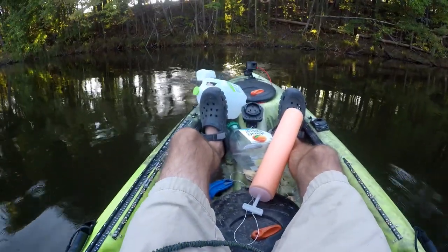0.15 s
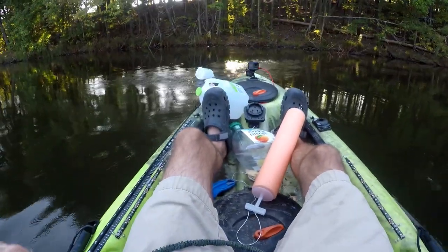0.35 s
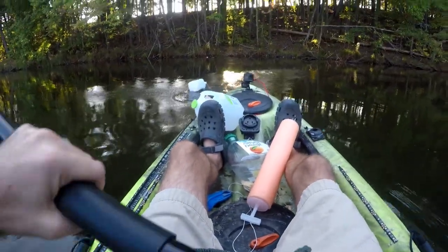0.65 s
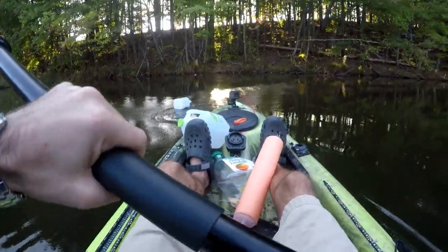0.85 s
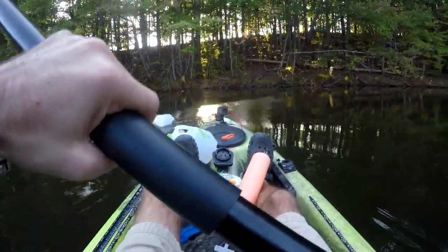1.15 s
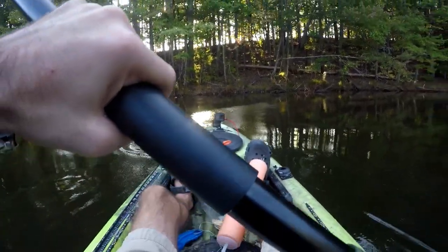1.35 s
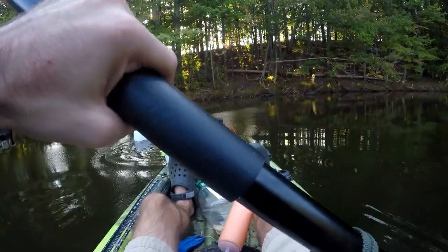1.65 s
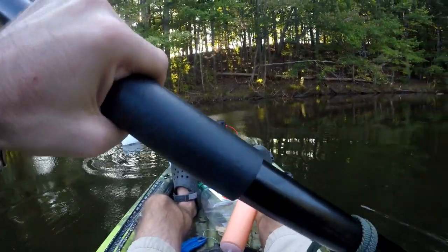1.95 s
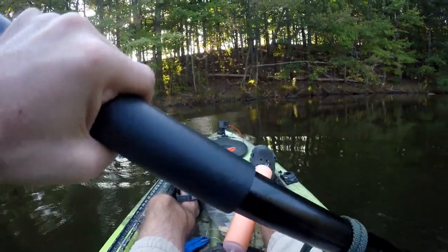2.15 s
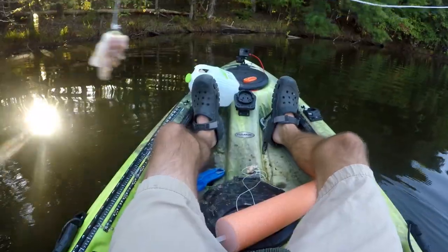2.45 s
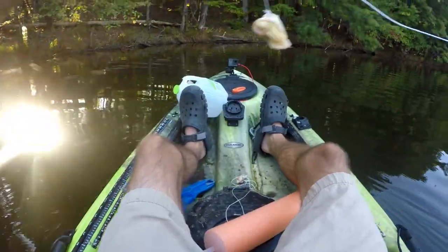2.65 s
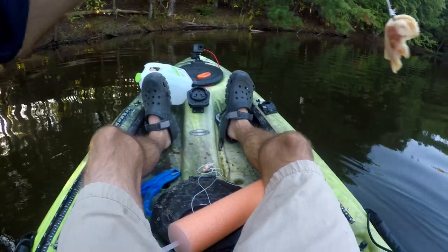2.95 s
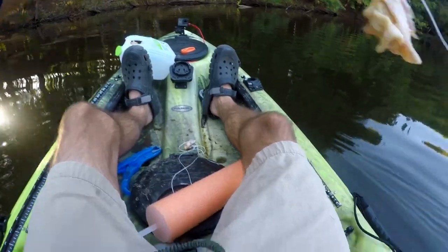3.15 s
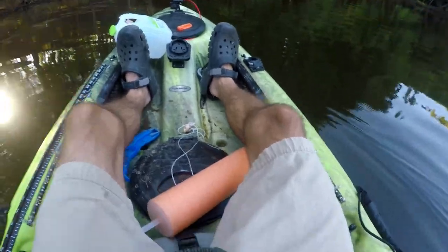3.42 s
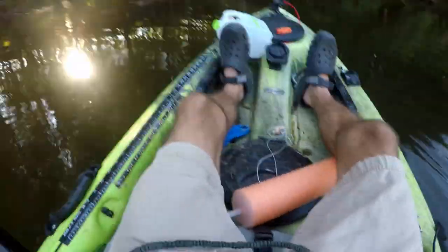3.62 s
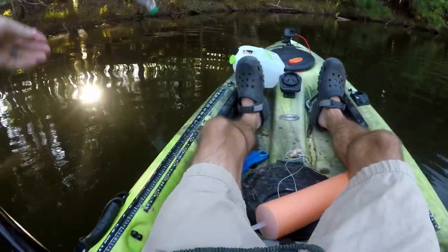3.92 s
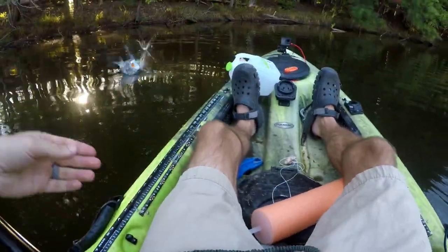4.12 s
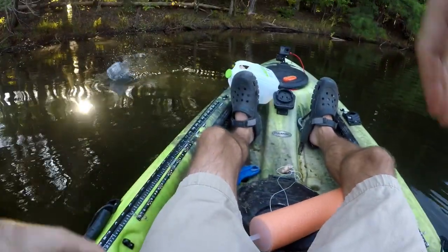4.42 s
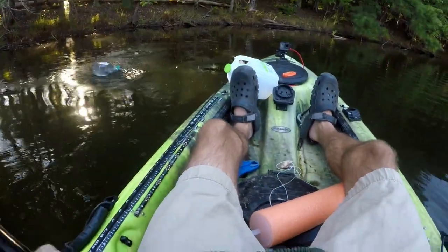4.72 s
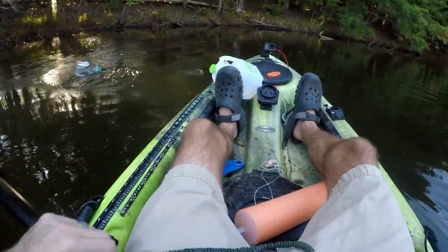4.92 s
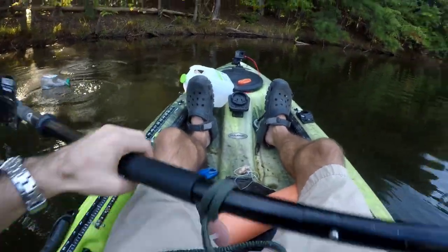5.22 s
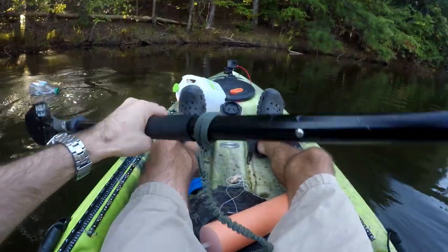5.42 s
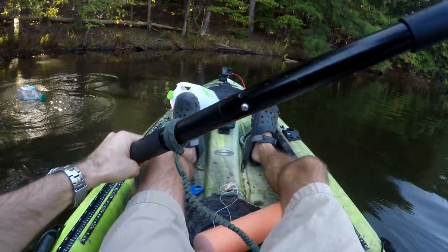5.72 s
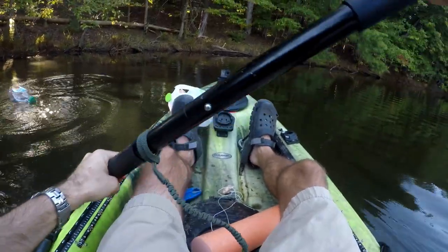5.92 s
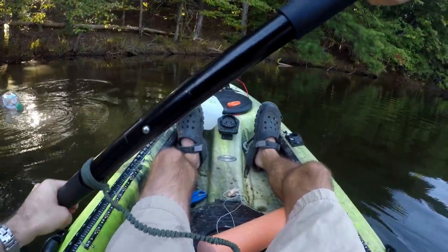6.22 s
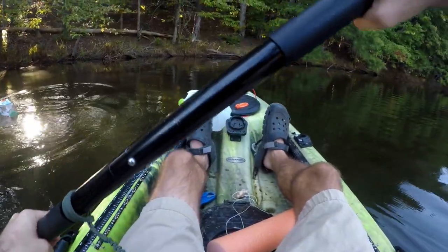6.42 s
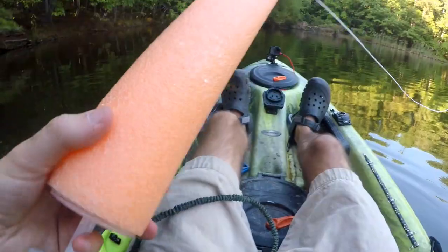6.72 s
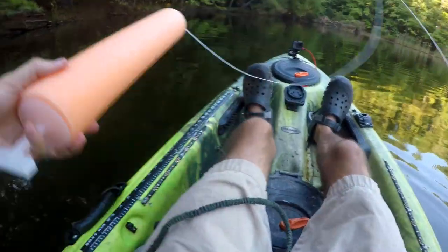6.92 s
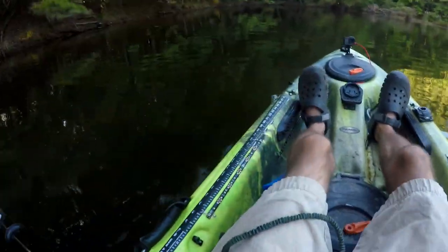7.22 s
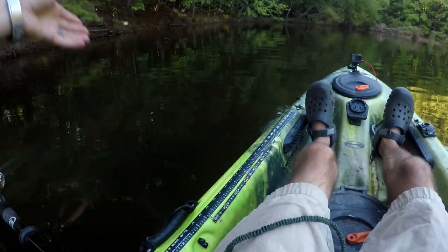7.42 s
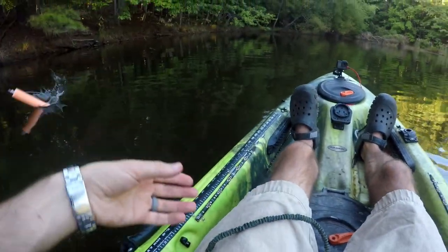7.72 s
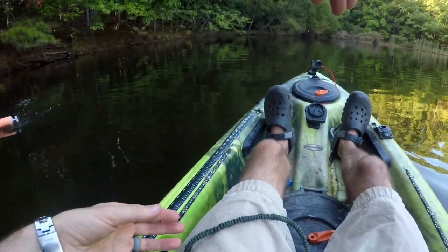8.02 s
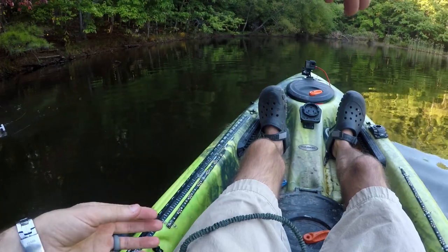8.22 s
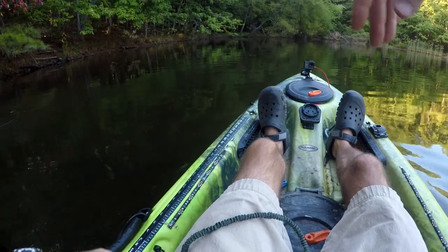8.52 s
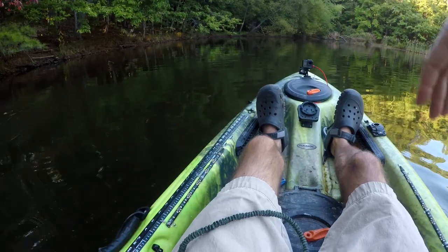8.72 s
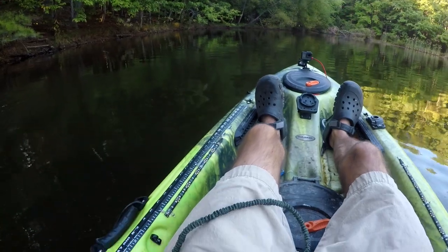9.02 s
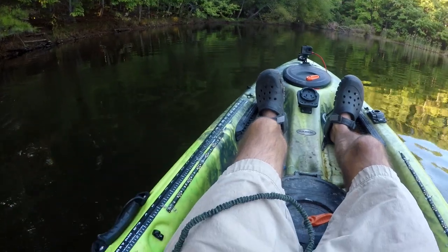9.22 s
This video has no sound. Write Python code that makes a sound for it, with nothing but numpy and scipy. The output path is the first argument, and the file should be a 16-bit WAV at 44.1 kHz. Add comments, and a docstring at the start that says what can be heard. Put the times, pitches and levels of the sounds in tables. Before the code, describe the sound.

Hollow plastic knocks, rustling and microphone bumps on a quiet pond, as two light objects splash into the water and bubble.

```python
"""On a still pond, gear is handled in a plastic kayak, heard by a chest-worn camera.
A far engine hums and an insect trills. The camera sways and is jolted; cloth and line rustle.
A bottle and a foam float are tossed into the water, which splashes and rings with tiny bubbles.
A paddle drips and knocks the hull. The sound drops out twice and cuts off just before the end."""
import sys
import numpy as np
from scipy import signal
from scipy.fft import rfft, irfft, next_fast_len
from scipy.io import wavfile
from scipy.ndimage import uniform_filter1d

SR = 44100
rng = np.random.default_rng(int(sys.argv[2]) if len(sys.argv) > 2 else 0)


def log_audio(samples):
    """Write samples as a 16-bit WAV file to the path given in sys.argv[1]."""
    # one column per channel
    frames = np.atleast_2d(samples).T
    # limit to full scale, then quantise
    limited = np.clip(frames, -1, 1)
    pcm = np.round(limited * 32767).astype(np.int16)
    wavfile.write(sys.argv[1], SR, pcm)


N = 412631


def amp(db):
    return 10 ** (np.asarray(db) / 20)

def unit_rms(x):
    return x / np.sqrt(np.mean(x ** 2) + 1e-20)

def curves(rows):
    """Joins timed rows with straight lines, one curve per value column."""
    times, *columns = np.transpose(rows)
    return [np.interp(np.arange(N) / SR, times, column) for column in columns]

def add(mix, start, sound):
    part = mix[round(start * SR):][:len(sound)]
    part += sound[:len(part)]

def coloured(x, tone):
    """Filters x to a tone table and sets its strength to 1."""
    tone_hz, db = np.transpose(tone)
    size = next_fast_len(len(x))
    hz = np.fft.rfftfreq(size, 1 / SR)
    gain = amp(np.interp(np.log(hz + 0.87), np.log(tone_hz), db))
    return unit_rms(irfft(rfft(x, size) * gain, size)[:len(x)])

def banded(x, hz, octaves):
    """Keeps a band around hz, wider on the low side; the highest treble is cut."""
    f = np.fft.rfftfreq(len(x), 1 / SR) + 1
    away = np.log2(f / hz) / max(octaves, .05)
    away = np.where(away < 0, 0.28 * away, away)
    return irfft(rfft(x) * np.exp(-.5 * away ** 2) / (1 + (f / 14800) ** 16), len(x))

def resonate(x, hz, width_hz):
    """Makes x ring around one pitch."""
    r = np.exp(-np.pi * width_hz / SR)
    return 2 * signal.lfilter([1 - r], [1, -r * np.exp(2j * np.pi * hz / SR)], x).real


# The tone of the air. Each row: frequency in Hz, relative level in dB.
AIR_TONE = [(35, -31), (60, 0.5), (129, -12), (556, -24), (1110, -31), (1900, -28), (3900, -38),
            (10800, -42), (13500, -49), (14400, -53), (14900, -110)]

def air():
    """Open air makes a faint, steady rush."""
    return amp(-57) * coloured(rng.standard_normal(N), AIR_TONE)

# The engine's loudness. Each row: time in seconds, level in dB.
ENGINE_LEVELS = [(0, -88), (.25, -44.5), (1.2, -43.5), (2.23, -49), (2.3, -57), (4.1, -58.5), (4.3, -47.5),
                 (5.0, -57.5), (5.2, -67.5), (9.4, -67)]
# Its tones. Each row: multiple of the firing rate, relative level in dB.
ENGINE_TONES = [(2, 0.5), (3, -17.5), (4, -14)]

def engine(firing_hz=53.1):
    """A far motor hums at multiples of its firing rate, wavering a little."""
    waver = coloured(rng.standard_normal(N), [(.3, -1.5), (4, -4.0), (12, -67)])
    turns = np.cumsum(firing_hz * (1 + .006 * waver)) / SR
    hum = sum(amp(db) * np.sin(2 * np.pi * k * turns) for k, db in ENGINE_TONES)
    return amp(curves(ENGINE_LEVELS)[0] + 1.6 * waver[::-1]) * hum

# The insect's loudness. Each row: time in seconds, level in dB.
INSECT_LEVELS = [(0, -90), (8.25, -90), (8.4, -72.5), (9.4, -77)]
# Where its wings ring. Each row: pitch in Hz, width in Hz, relative level in dB.
WING_RINGS = [(10970, 560, -10), (12320, 2000, -4)]

def insect(chirps_per_s=56):
    """An insect on the bank rasps its wings in quick, even chirps."""
    strokes = np.maximum(np.sin(2 * np.pi * chirps_per_s * np.arange(N) / SR + 1.1) + .3, 0)
    rasp = strokes * rng.standard_normal(N)
    trill = sum(amp(db) * resonate(resonate(rasp, hz, width), hz, width) for hz, width, db in WING_RINGS)
    return amp(curves(INSECT_LEVELS)[0]) * unit_rms(trill)

# Body movement. Each row: time in seconds, slow heave in dB, quicker shake in dB.
SWAY_LEVELS = [(0.0, -14, -36), (0.6, -26, -49), (1.37, -30.5, -41.5), (1.94, -43.5, -50), (3.05, -27, -47),
               (3.13, -48, -45), (3.29, -6, -51), (3.39, -30, -36), (3.5, -10, -35), (4.45, -22, -48.5),
               (4.87, -26, -46.5), (4.95, -13.5, -44), (5.15, -31, -44), (5.28, -17.5, -38),
               (5.44, -36, -53), (5.77, -24.5, -37), (6.19, -30, -50), (6.73, -29.5, -51),
               (6.94, -9.5, -32), (7.3, -14, -37), (7.72, -29, -42), (7.87, -25.5, -50), (8.39, -31, -59),
               (9.3, -39, -51.5)]
# The tone of each movement. Each row: frequency in Hz, relative level in dB.
HEAVE_TONE = [(1, 8.5), (3, 11), (6, 14.5), (9, 6.5), (16, -0.5), (24, -20), (40, -81)]
SHAKE_TONE = [(12, -38), (22, -4), (40, -2), (80, -15), (160, -35.5), (400, -78.5)]

def sway():
    """The moving body pumps the microphone: swings too deep to hear, and a low shake."""
    heave_db, shake_db = curves(SWAY_LEVELS)
    heave = coloured(rng.standard_normal(N), HEAVE_TONE)
    heave /= np.sqrt(uniform_filter1d(heave ** 2, size=12000) + 0.051)  # evens out the swings
    shake = coloured(rng.standard_normal(N), SHAKE_TONE)
    return amp(heave_db) * heave + amp(shake_db) * shake

# Camera bumps. Each row: start in seconds, peak in dB, relative sharp edge in dB, fade in seconds.
JOLTS = [(0.059, -15.5, -38, 0.08), (0.403, -20.5, -33, 0.08), (0.707, -26.5, -28, 0.19),
         (1.046, -23.5, -31, 0.11), (3.793, -13.5, -31, 0.063), (4.193, -12.5, -36, 0.066),
         (5.128, -15, -32.5, 0.26), (5.473, -19, -31.5, 0.25), (5.775, -24, -40, 0.23),
         (6.866, -25, -29, 0.095), (7.088, -26, -33, 0.15), (7.2, -15, -27.5, 0.082),
         (9.287, -29, -25, 0.25)]

def jolt(db, edge_db, fade_s):
    """The camera mount flexes: treble comes first, then the swing slows to one deep push."""
    t = np.arange(6000) / SR
    hz = 14 + 1500 * np.exp(-t / .0016) + 480 * np.exp(-t / .0038)
    turns = np.cumsum(hz) / SR
    swing = np.cos(2 * np.pi * (turns - turns[round(.0085 * SR)]))
    rise = amp(edge_db) * np.minimum(t / 0.00057, 1) + np.minimum(t / 0.00866, 1) ** 2
    push = -rise * amp(-60 * t / fade_s) * swing
    return amp(db) * push / abs(push).max()

def grainy(per_s, spread_db, smooth):
    """Noise that jumps in short random bursts above a smooth floor."""
    sizes = amp(spread_db * np.minimum(rng.exponential(1, N), 4))
    kicks = sizes * (rng.random(N) < per_s / SR)
    bursts = signal.lfilter([1], [1, -np.exp(-1 / (0.004 * SR))], kicks)
    return (smooth + unit_rms(bursts)) * rng.standard_normal(N)

def bubbles(per_s, low_hz, high_hz):
    """Small bubbles ring at random moments, each rising in pitch."""
    born = rng.random(N) < per_s / SR
    which_pitch = rng.integers(0, 24, N)
    sizes = born * amp(3 * np.minimum(rng.exponential(1, N), 3))
    water = np.zeros(N)
    for k, hz in enumerate(np.geomspace(low_hz, high_hz, num=24)):
        cycles = np.arange(round(14 * SR / hz)) * hz / SR
        fade = np.exp(-cycles / 4.5) * np.minimum(cycles, 1)
        ring = fade * np.sin(2 * np.pi * cycles * (1 + .012 * cycles))
        water += signal.oaconvolve(sizes * (which_pitch == k), ring)[:N] * np.sqrt(hz)
    return unit_rms(water)

# Stirring, in two lists: before and after the bottle lands.
# Each row: time in seconds, low wash in dB, high fizz in dB.
STIR_LEVELS = [
    [(0.0, -47, -57.5), (0.17, -58, -61), (0.52, -57.5, -66), (0.85, -55, -66), (1.15, -57.5, -70),
     (1.93, -59.5, -71), (2.45, -57, -70), (2.91, -59, -75.5), (3.23, -55, -68), (3.33, -49.5, -60),
     (3.48, -48, -60), (3.69, -46, -63), (3.85, -54, -64.5), (4.04, -55, -71)],
    [(4.07, -27.5, -63), (4.23, -44.5, -57), (4.4, -40.5, -58), (4.67, -54.5, -63), (4.96, -51.5, -59.5),
     (5.24, -63, -70), (5.74, -59, -76), (6.47, -61.5, -75.5), (6.91, -51, -63), (7.03, -45.5, -58.5),
     (7.43, -58.5, -70.5), (7.89, -60.5, -63), (8.31, -63, -68.5), (9.3, -61.5, -69.5)],
]
# The tone of each part. Each row: frequency in Hz, relative level in dB.
WASH_TONE = [(59, -23), (100, 3), (198, -5), (387, -11), (755, -14), (851, -14.5), (1970, -21), (2640, -26),
             (6000, -45.5), (7800, -67), (13200, -120)]
FIZZ_TONE = [(1800, -31), (3000, -4), (4500, -5.5), (7300, -10.5), (10000, -7.5), (14500, -8), (15300, -20),
             (15700, -93.5)]

def stir():
    """Cloth and line rustle while stirred water burbles."""
    wash_db, fizz_db = curves(np.vstack(STIR_LEVELS))
    rustle = unit_rms(grainy(per_s=140, spread_db=3.8, smooth=0.99))
    burble = amp(-16.5) * bubbles(per_s=240, low_hz=350, high_hz=4000)
    wash = coloured(burble + rustle, WASH_TONE)
    fizz = coloured(grainy(per_s=250, spread_db=3.5, smooth=0.78), FIZZ_TONE)
    return amp(wash_db) * wash + amp(fizz_db) * fizz

# Gurgling water. Each row: start in seconds, level in dB, seconds to fade by 60 dB.
GURGLES = [(4.09, -36.5, 0.67), (4.42, -44.5, 1.24), (7.63, -44, 0.55), (7.83, -63, 0.47),
           (7.96, -56.5, 1.8)]

def gurgle(rise_s=.015):
    """A crowd of bubbles rings after a splash and fades away."""
    t, level = np.arange(N) / SR, np.zeros(N)
    for start, db, fade_s in GURGLES:
        age = np.maximum(t - start, 0)
        level += np.minimum(age / rise_s, 1) * amp(db - 60 * age / fade_s)
    return level * bubbles(per_s=300, low_hz=446, high_hz=1900)

# Scrapes and sheets of spray.
# Each row: start in seconds, level in dB, pitch in Hz, width in octaves, length in seconds.
SWISHES = [(0.005, -48.5, 1700, 0.59, 0.075), (2.55, -59.5, 3000, 1.3, 0.16),
           (3.36, -51.5, 6030, 1.6, 0.14), (3.525, -53, 10980, 0.5, 0.062), (3.6, -53, 9000, 0.47, 0.065),
           (3.672, -41, 1480, 0.3, 0.022), (3.702, -43.5, 1890, 0.13, 0.035),
           (4.06, -45.5, 10070, 0.67, 0.087), (4.25, -34.5, 191.6, 0.28, 0.2), (4.47, -52, 2020, .12, 0.26),
           (4.47, -52, 4660, 0.17, 0.2), (4.41, -46.5, 4000, 1.3, .065), (4.49, -43.5, 746, 0.1, 0.26),
           (6.275, -41, 2460, 0.27, 0.032), (6.925, -47.5, 3400, 1.3, 0.16),
           (6.955, -35.5, 2080, 0.5, 0.045), (7.438, -47.5, 1240, 0.44, 0.051),
           (7.60, -39, 3000, 1.25, 0.056), (7.64, -41.5, 3400, 0.99, 0.085), (7.75, -44, 3380, 1.1, 0.06),
           (7.76, -41.5, 330, 0.13, 0.06), (7.80, -49, 4050, 0.34, 0.033),
           (7.87, -54.5, 3630, 0.089, 0.068), (7.955, -49.5, 1150, 0.33, 0.073),
           (8.275, -49.5, 3920, 0.59, 0.13), (8.28, -48, 2150, 0.1, .05)]

def swish(db, hz, octaves, length):
    """Many tiny slips in a row make lumpy noise that swells fast and fades."""
    progress = np.linspace(0, 1, round(max(length, .01) * SR))
    noise, lumps = rng.standard_normal((2, len(progress)))
    lumpy = noise * amp(3 * unit_rms(uniform_filter1d(lumps, size=120)))
    level = amp(db - 16 * progress) * signal.windows.tukey(len(progress), .35)
    return level * unit_rms(banded(lumpy, hz, octaves))

# Snaps of line, foam and splash drops.
# Each row: start in seconds, peak in dB, pitch in Hz, width in octaves.
SNAPS = [(0.0088, -38, 10100, 0.23), (0.0534, -36, 7100, .9), (0.1071, -41, 7200, 0.78),
         (0.1543, -39, 9700, 0.21), (0.3001, -38, 10000, 0.13), (0.7174, -30.5, 7500, 0.77),
         (0.7551, -34, 5200, 0.54), (0.7645, -39, 7000, 0.26), (0.9256, -28, 4320, .45),
         (0.9467, -36, 6560, .8), (1.0033, -37.5, 7360, 0.64), (1.033, -35, 7950, 0.55),
         (1.0795, -40, 6000, 1.2), (1.2688, -39, 4150, 0.45), (1.3, -28.5, 4070, .55),
         (1.4622, -44, 7200, 0.37), (1.537, -46, 7100, .65), (1.68, -41, 1700, .7),
         (2.823, -50, 1200, 0.47), (3.1663, -45, 9200, 0.27), (3.4, -33, 4300, 1.3),
         (3.5477, -37, 11500, .3), (3.5622, -38, 9100, .6), (3.6024, -40, 5200, .45),
         (3.6191, -25.5, 11300, 0.084), (3.6282, -33, 9300, 0.25), (3.7222, -40, 6130, .9),
         (3.7915, -39.5, 3430, .3), (3.8288, -38, 4900, 0.54), (3.8397, -37, 3940, 0.24),
         (3.9036, -42, 5270, 0.29), (3.9235, -36, 6100, 0.55), (4.0534, -19, 9000, 0.88),
         (4.0589, -16, 3750, .4), (4.0647, -15, 2440, .25), (4.0995, -28.5, 10200, 0.16),
         (4.1615, -33, 9700, 0.87), (4.2472, -38, 10100, 0.12), (4.362, -36, 3000, 0.45),
         (4.4104, -40, 9700, .4), (4.4264, -27.5, 4000, 0.37), (4.4315, -28, 4020, 0.33),
         (4.46, -30, 6500, 1.1), (4.6905, -38.5, 7250, 0.12), (5.0969, -38.5, 5700, 0.83),
         (5.5453, -41, 6850, 0.84), (5.8145, -34, 5170, 1.5), (6.0699, -41, 5750, 0.38),
         (6.1624, -43, 5070, 0.94), (6.2281, -39.5, 4300, 0.6), (6.2756, -40.5, 3510, 0.88),
         (6.5833, -43, 5460, 0.48), (6.6885, -40.5, 3600, 0.24), (6.9737, -35, 5770, 1.3),
         (6.9857, -20.5, 6500, 1.3), (7.0415, -30, 8300, 0.34), (7.0466, -30.5, 8300, .45),
         (7.3946, -26.5, 4800, 0.6), (7.4403, -40, 3520, 1.15), (7.6166, -16, 5650, .8),
         (7.626, -23, 4740, 0.33), (7.6674, -27.5, 4800, 0.31), (7.7701, -35, 6070, .9),
         (7.8974, -37, 7600, 0.46), (7.9667, -42, 4140, .45), (8.1964, -22, 9900, 0.32),
         (8.3339, -23, 4750, .6), (8.3727, -34, 6330, .8)]

def snap(db, hz, octaves):
    """A sudden burst of noise in one band; louder snaps ring longer."""
    t = np.arange(4096) / SR
    fade_s = max(0.0069 * 2 ** ((db + 40) / 20), .002)
    noise = rng.standard_normal(len(t)) * amp(-60 * t / fade_s)
    burst = banded(np.roll(noise, 40), hz, octaves)
    return amp(db) * burst / abs(burst).max()

# Showers of drops. Each row: start in seconds, length in seconds, lowest peak in dB, middle pitch in Hz.
SHOWERS = [(0.019, 0.29, -58, 8600), (0.701, 0.054, -43, 7500), (0.986, 0.083, -44.5, 8500),
           (3.534, .035, -40.5, 11100), (3.615, 0.032, -42, 9000), (4.079, 0.44, -45, 6300),
           (4.504, 0.16, -50.5, 4900), (6.049, .03, -48, 4610), (6.93, .06, -49, 5470),
           (7.6, 0.1, -51, 4500), (7.75, 0.26, -48, 4500), (8.268, .13, -54, 4525)]

def falling_drops(per_s=65, pitch_range_octaves=1.2):
    """Drops fall back on the pond at random; returns one row per drop for snap()."""
    rows = []
    for start, length, db, hz in SHOWERS:
        when, size, pitch, width = rng.random((round(per_s * length), 4)).T
        drop_hz = np.minimum(hz * 2 ** (pitch_range_octaves * (pitch - .5)), 13000)
        rows += zip(start + length * when, db - np.log(size), drop_hz, .4 * (.5 + width))
    return rows

# Drips. Each row: start in seconds, level in dB, rough first and last pitch in Hz, length in seconds.
DRIPS = [(.075, -52, 1280, 1430, 0.038), (.128, -58, 1510, 2000, 0.046), (.722, -37.5, 520, 453, 0.034),
         (.86, -51.5, 506, 1280, 0.047), (.927, -41, 1710, 1610, 0.018), (1.045, -42.5, 970, 1560, 0.023),
         (1.079, -47, 897, 2820, 0.091), (1.124, -40.5, 1150, 2050, 0.017), (4.19, -31, 234.5, 322, 0.083),
         (4.205, -24, 98.3, 131, 0.058), (4.3, -46, 164.2, 220, 0.13), (4.363, -37, 975, 897, 0.017),
         (4.415, -31, 680, 487, 0.012), (4.43, -22.5, 1460, 1700, 0.0077), (4.465, -44, 1455, 1280, 0.058),
         (4.572, -41, 1260, 1410, 0.015), (6.07, -44, 1036, 1790, 0.0069), (6.215, -44, 1060, 1580, 0.0076),
         (6.277, -48, 1290, 2220, 0.012), (6.481, -46.5, 1500, 1270, 0.0072),
         (6.68, -34.5, 780, 1320, 0.02), (7.44, -32.5, 1625, 1520, 0.0096),
         (7.652, -34.5, 1040, 606, 0.029), (7.658, -32.5, 1800, 1920, 0.0077),
         (7.845, -53, 1104, 2230, 0.023), (7.902, -43, 1593, 1900, 0.0071), (8.02, -51.5, 781, 1150, 0.032),
         (8.128, -51, 1470, 1900, 0.022), (8.17, -47, 546, 960, 0.04), (8.28, -51, 624, 645, 0.12)]

def drip(db, start_hz, end_hz, length):
    """A drop traps a bubble that starts a little sharp, settles, and bends as it nears the surface."""
    progress = np.linspace(0, 1, round(max(length, .004) * SR))
    bend = np.clip(length / .03, 1, 3.5) if end_hz > start_hz else 1  # long rising notes bend latest
    pitch_wobble, level_wobble = uniform_filter1d(rng.standard_normal((2, len(progress))), size=120)
    glide_hz = start_hz * (end_hz / start_hz) ** (progress ** bend)
    hz = glide_hz * (1 + .12 * np.exp(-progress * length / .003) + .3 * pitch_wobble)
    level = amp(db - 11.3 * progress + 46 * level_wobble) * signal.windows.tukey(len(progress), .12)
    return level * np.sin(2 * np.pi * np.cumsum(hz) / SR)

# The notes hull and bottle ring at. Each row: pitch in Hz, relative level in dB, base fade in seconds.
HULL_NOTES = [(107, -7.5, 0.45), (131, -7, 0.34), (176, -0.5, 0.22), (230, -5.5, 0.13), (291, 1.5, 0.083),
              (366.4, -7, 0.14), (490, -15, 0.17), (522, -12.5, 0.14), (606, -8, 0.075),
              (718, -11.5, 0.091), (848, -16.5, 0.089), (1060, -15.5, 0.065), (1370, -19, 0.058),
              (1710, -21.5, 0.075), (2012, -16, .04), (2320, -25.5, 0.085)]
BOTTLE_NOTES = [(124.3, -4, 0.27), (234, -8.5, 0.54), (256, 6, 0.27), (323, 5, 0.18), (346, -4, 0.12),
                (418, 1.5, .1), (520, 3.5, 0.08), (553.6, -3.5, 0.21), (634.6, -3.5, 0.11),
                (716, -7.5, 0.24), (803, -13.5, 0.26), (911, -8.5, 0.13), (1106, -12.5, 0.19),
                (1273, -15, 0.15), (1475, -12, 0.11), (1610, -12, 0.085), (1790, -11.5, 0.096),
                (2143, -17.5, 0.089), (2325, -21.5, 0.1)]
# Knocks on each. Each row: start in seconds, level in dB, hardness in dB per octave,
# a number that multiplies the fade times, relative crack level in dB, rattle level in dB.
HULL_KNOCKS = [(1.3, -28.5, 2.4, 0.9, -8.5, -47.5), (2.335, -41, 0.34, 0.73, -28, -67),
               (3.867, -37, 0.48, 0.97, -21, -53), (5.814, -13, 0.35, 0.88, -12.5, -42),
               (7.184, -27.5, 1.7, 0.59, -10, -58), (7.396, -25.5, 1.6, 0.87, -1.5, -43.5),
               (7.616, -25, 3.7, 0.61, 3.5, -48)]
BOTTLE_KNOCKS = [(3.298, -33.5, 9, 0.38, -16, -42.5), (3.4, -17.5, 4.5, 0.43, -1, -28.5),
                 (3.603, -32, -3, 0.39, -19, -33.5), (4.056, 1, 2, 0.63, -32, -24.5)]
HULL_RATTLE, BOTTLE_RATTLE = (210, 0.83), (484, 0.26)  # pitch in Hz, width in octaves

def knock(notes, db, hardness, ring, crack_db):
    """Struck thin plastic cracks, then rings in close pairs of fluttering notes."""
    t = np.arange(14000) / SR
    hz, note_db, fade_s = np.transpose(notes)[:, :, None]
    flutter = uniform_filter1d(rng.standard_normal((len(notes), len(t))), size=500, axis=1)
    level_db = note_db + hardness * np.log2(hz / 500) + 40 * flutter - 60 * t / (ring * fade_s)
    rise = 1 - np.exp(-t * hz / 1.14)  # low notes travel slowly through the plastic
    turns = hz * t + rng.random(hz.shape)
    pairs = np.sin(2 * np.pi * turns) + 0.23 * np.sin(2 * np.pi * 1.045 * turns)
    ringing = (amp(level_db) * rise * pairs).sum(0)
    dull_noise = signal.lfilter([.2], [1, -.85], rng.standard_normal(len(t)))
    crack = dull_noise * amp(crack_db - 60 * t / (0.053 * ring))
    return amp(db) * (0.47 * ringing / np.std(ringing[:800]) + crack)


def scene():
    """Lays the knocks and other short sounds over the background, in one channel."""
    mix = sway() + stir() + air() + engine() + insect() + gurgle()
    for knocks, notes, rattle in ((BOTTLE_KNOCKS, BOTTLE_NOTES, BOTTLE_RATTLE),
                                  (HULL_KNOCKS, HULL_NOTES, HULL_RATTLE)):
        for start, db, hardness, ring, crack_db, rattle_db in knocks:
            add(mix, start, knock(notes, db, hardness, ring, crack_db))
            add(mix, start + .01, swish(rattle_db, *rattle, length=ring * .19))
    for rows, sound in ((JOLTS, jolt), (DRIPS, drip), (SNAPS, snap), (SWISHES, swish),
                        (falling_drops(), snap)):
        for start, *settings in rows:
            add(mix, start, sound(*settings))
    return mix[None]

# Silences. Each row: start in seconds, end in seconds, fade-out in seconds.
DROPOUTS = [(2.2385, 2.2635, .0001), (6.6995, 6.7225, .004), (9.2975, 9.4, .0001)]

def record(dry, top_hz=16000):
    """Overload flattens the loudest peaks, the sound drops out, and the highest treble is cut."""
    t, gate = np.arange(N) / SR, np.ones(N)
    for start, end, fade_s in DROPOUTS:
        gate *= np.clip(np.maximum((start - t) / fade_s, (t - end) / .0012), 0, 1)
    gated = np.clip(dry, -.95, .95) * gate
    lowpass = signal.firwin(511, top_hz, window=("kaiser", 9), fs=SR)
    return signal.oaconvolve(gated, lowpass[None], "same")


dry = scene()
out = record(dry)
log_audio(out)
```